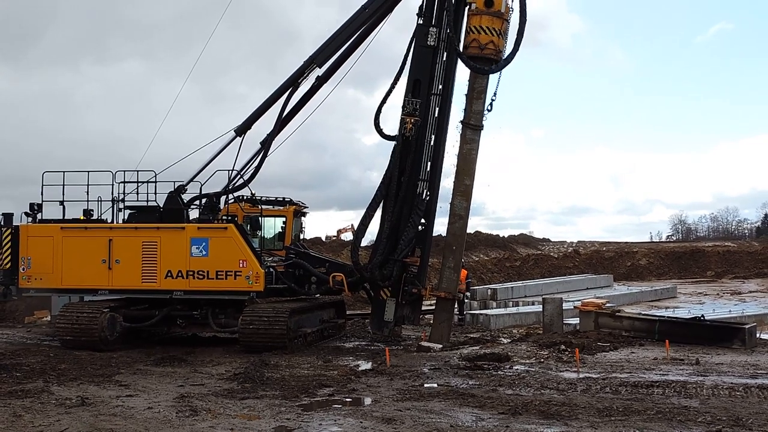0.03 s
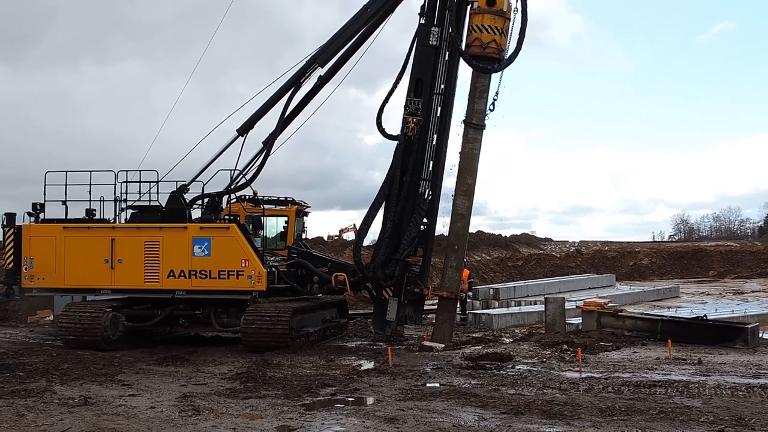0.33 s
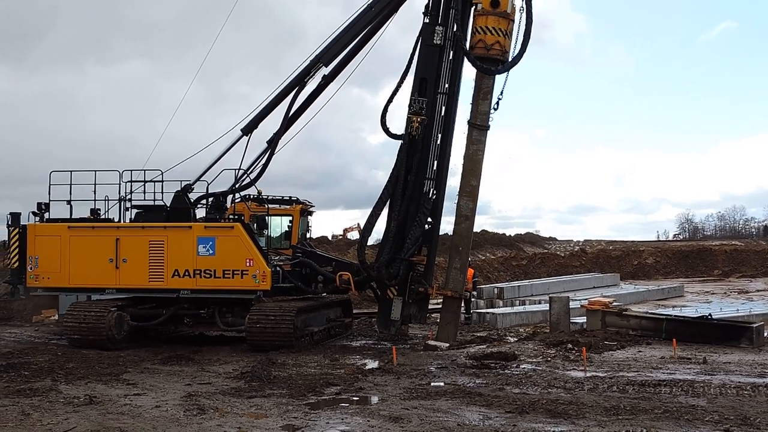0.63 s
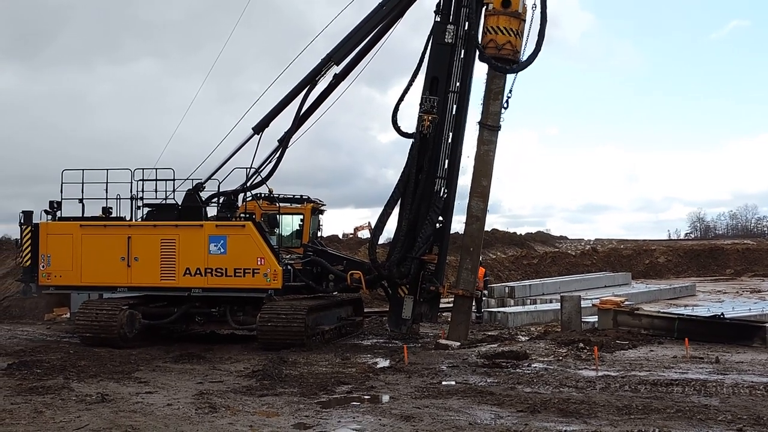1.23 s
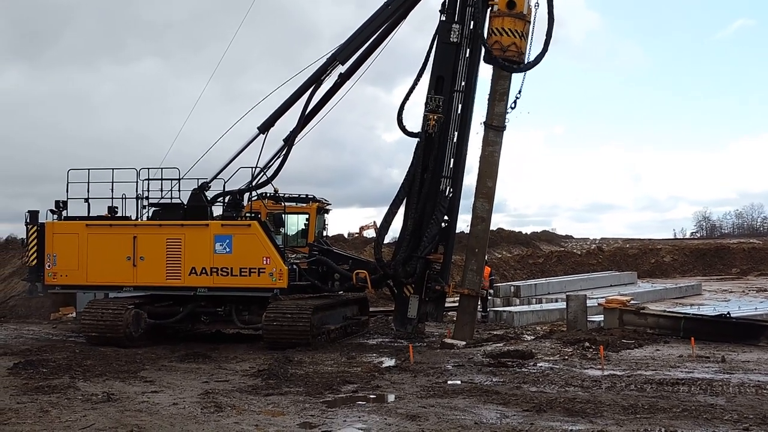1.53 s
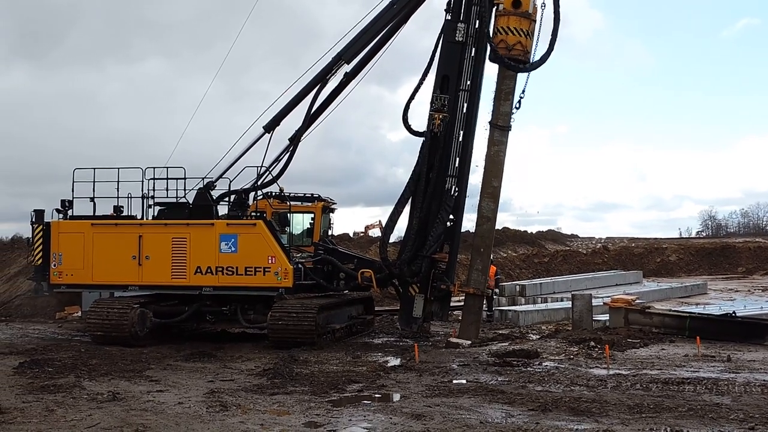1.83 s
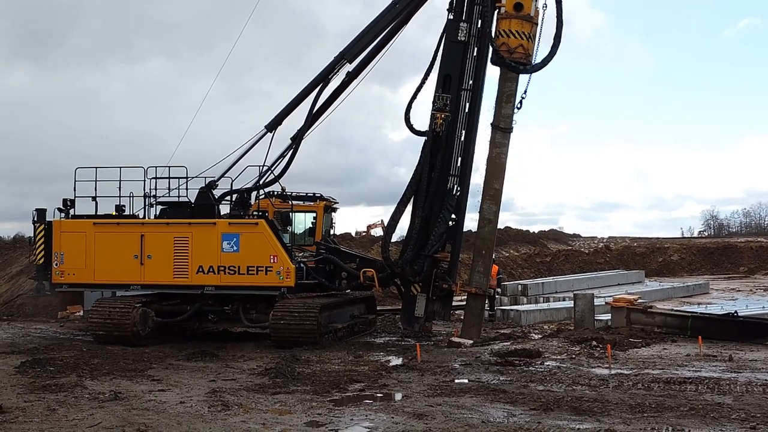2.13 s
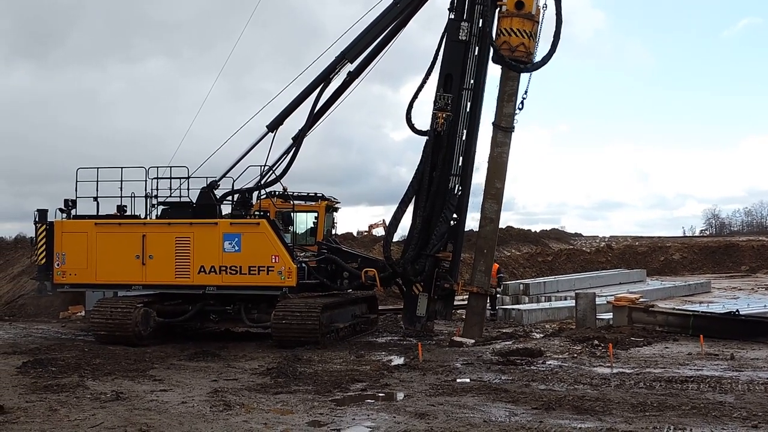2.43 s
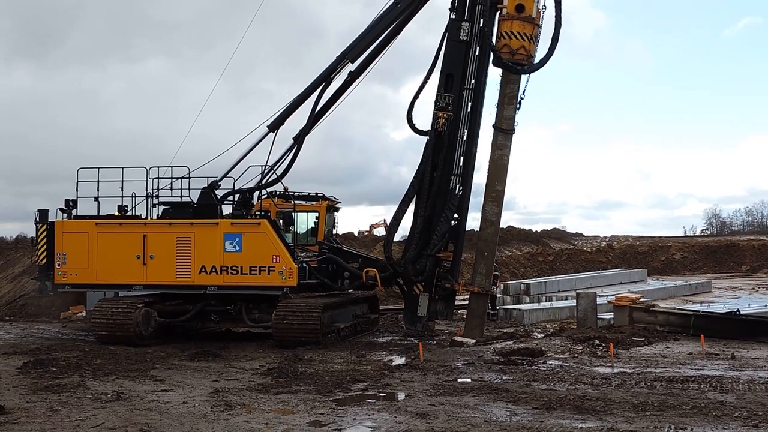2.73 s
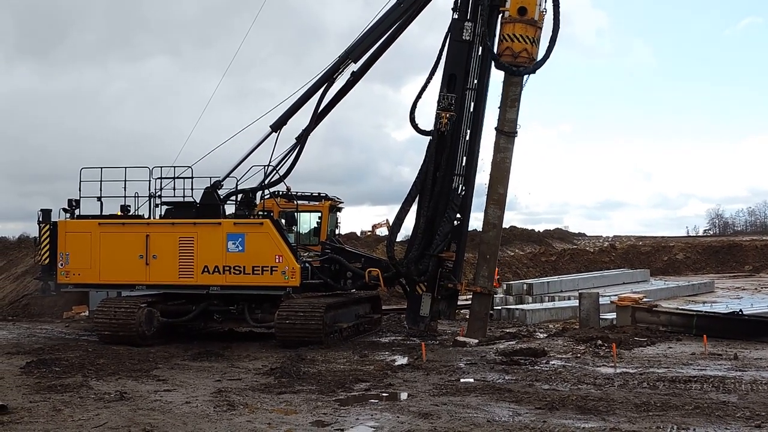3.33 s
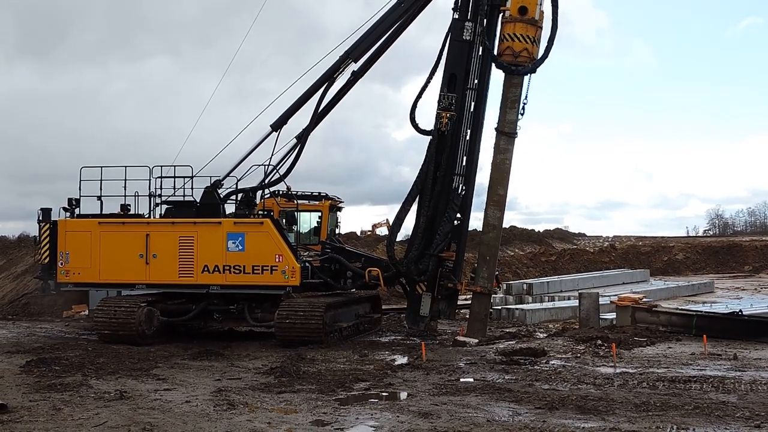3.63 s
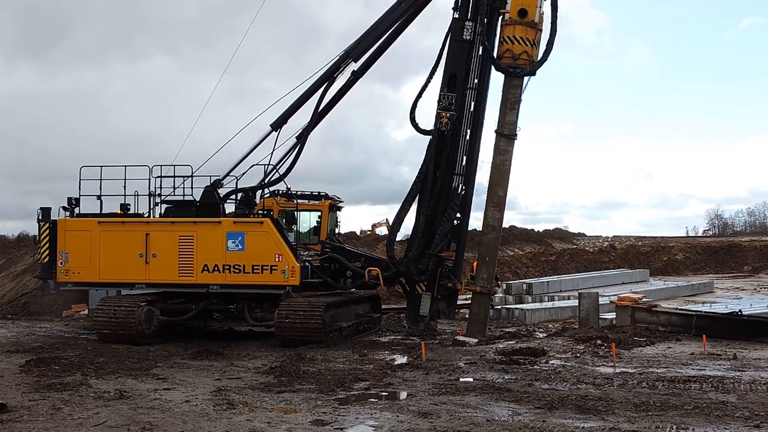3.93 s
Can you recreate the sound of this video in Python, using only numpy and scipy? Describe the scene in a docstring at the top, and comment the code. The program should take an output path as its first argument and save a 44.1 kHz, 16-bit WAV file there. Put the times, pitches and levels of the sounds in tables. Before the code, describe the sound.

Heavy pile driver blows repeat evenly outdoors, eight in all, each a deep boom with a steel clang and a short rattle. Faint valve hisses and chain clinks fall between the strikes, while a diesel engine rumbles underneath.

```python
"""An open building site: a hydraulic drop hammer drives a concrete pile, just under two blows a second.
The rig's diesel engine rumbles underneath. Each blow booms in the pile, clangs in the steel housing
and mast, rattles the chains and fittings and sets the drive cap's sleeve ringing. The ram bounces,
the valves hiss as it is lifted again, and the chain clinks near the top."""
import sys
import numpy as np
from scipy import signal
from scipy.fft import rfft, irfft
from scipy.io import wavfile

SR = 44100
rng = np.random.default_rng(int(sys.argv[2]) if len(sys.argv) > 2 else 0)


def transcribe(u):
    """Save the signal u as a 16-bit wav file named by the first command-line argument.

    u: samples, shape (n,) or (channels, n), limited to [-1, 1]; the rate is SR.
    q: integer samples, one column per channel.
    """
    v = np.clip(np.atleast_2d(u).T, -1, 1)
    q = np.round(v * 32767).astype(np.int16)
    wavfile.write(sys.argv[1], SR, q)


N = 176400
TIME_S = np.arange(N) / SR
AGE_S = TIME_S[:SR]   # each strike rings out within 1 s
BIN_HZ = np.arange(N // 2 + 1) * SR / N


def from_db(db):
    """Decibels to gain."""
    return 10 ** (np.asarray(db) / 20)


def at_hz(points, hz):
    """Read a table on a log-frequency axis."""
    point_hz, value = np.transpose(points)
    return np.interp(np.log(np.maximum(hz, 1)), np.log(point_hz), value)


def drift(rate_hz):
    """Low-passed random motion, standard deviation 1."""
    slow = irfft(rfft(rng.standard_normal(N)) / (1 + (BIN_HZ / rate_hz) ** 2), N)
    return (slow - slow.mean()) / slow.std()


def envelope(rise_s, t60_s):
    """Quick swell, exponential decay."""
    return (1 - np.exp(-(AGE_S / rise_s) ** 2)) * from_db(-60 * AGE_S / t60_s)


def add(out, start_s, sound):
    """Mix a sound in at a given time."""
    start = int(np.clip(start_s * SR, 0, out.shape[-1]))
    part = sound[..., :out.shape[-1] - start]
    out[..., start:start + part.shape[-1]] += part


def stereo(mid, side, correlation):
    """Left and right with a given correlation."""
    correlation = np.clip(correlation, 0, .999)
    side = side * np.sqrt((1 - correlation) / (1 + correlation))
    return np.array([mid + side, mid - side])


def noise(spectrum, correlation, ripple_db=0, ripple_spacing_hz=24.73):
    """Steady stereo noise; ripple adds the close resonances of steel fittings."""
    mid, side = rfft(rng.standard_normal((2, N)))
    ripple = np.interp(BIN_HZ / ripple_spacing_hz, np.arange(4096), rng.standard_normal(4096))
    gain = from_db(at_hz(spectrum, BIN_HZ) + ripple_db * ripple)
    return irfft(stereo(mid, side, at_hz(correlation, BIN_HZ)) * gain, N) * np.sqrt(SR / 2)


# Each row: frequency in Hz, rumble density in dB per Hz.
ENGINE_SPECTRUM = [(20, -91), (35, -59.5), (55, -59.5), (110, -57.5), (260, -56.5), (420, -62.5),
                   (700, -69), (1000, -75), (1500, -83.5), (2100, -91.5), (3000, -101), (4200, -113),
                   (6300, -115), (8500, -127), (13000, -134)]
# Each row: frequency in Hz, left-right correlation.
ENGINE_CORRELATION = [(40, 0.2), (100, 0.083), (250, 0.19), (900, 0.26), (3000, 0.25), (8000, .15)]
# Each row: multiple of the firing rate, level in dB.
ENGINE_HARMONICS = [(1, -46), (2, -52), (3, -44.5), (4, -42.5), (6, -51.5)]
# Each row: time in seconds, gain in dB.
ENGINE_GAIN = [(0, -4), (.3, -4.5), (.56, -8), (.8, -5.5), (1.15, 1.5), (2, -0.5), (2.7, 1.5), (3.2, 0),
               (3.6, 2.5), (4, 5)]


def engine(firing_hz=67.83, throb_depth=0.19, speed_wobble=0.01196, flutter_db=1):
    """Diesel rumble throbs at the firing rate, over a faint hum of low orders."""
    phase = 2 * np.pi * np.cumsum(firing_hz * (1 + speed_wobble * drift(4.8))) / SR
    rumble = noise(ENGINE_SPECTRUM, ENGINE_CORRELATION) * (1 + throb_depth * np.cos(phase))
    rumble *= from_db(flutter_db * drift(9))
    hum = sum(from_db(db) * np.sin(order * phase + rng.uniform(0, 2 * np.pi))
              for order, db in ENGINE_HARMONICS)
    return (rumble + hum) * from_db(np.interp(TIME_S, *np.transpose(ENGINE_GAIN)))


STEEL_RIPPLE_DB, CHATTER_GRAIN_DB = 3.5, 2.5
# All hammer noises. Each row: frequency in Hz, left-right correlation.
HAMMER_CORRELATION = [(60, 0.95), (300, 1), (1200, 0.99), (2500, 0.76), (4500, 0.98), (8000, 0.41),
                      (13000, .1)]
# Each row: start in seconds, level in dB.
CLACK_EVENTS = [(0.056, -10), (0.25, 0.5), (0.816, -0.5), (2.533, -7.5), (3.067, 1), (3.133, -5.5),
                (3.785, -11), (3.841, -9.5)]
# Each row: frequency in Hz, density in dB per Hz.
CLACK_SPECTRUM = [(60, -86), (300, -66), (900, -62.5), (1700, -70), (2600, -77), (4300, -90.5),
                  (6000, -105.5), (13000, -112)]


def clacks():
    """Stray knocks of the chain or the guide."""
    level = np.zeros(N)
    for start_s, db in CLACK_EVENTS:
        add(level, start_s, from_db(db) * envelope(rise_s=0.0053, t60_s=.25))
    grain = from_db(CHATTER_GRAIN_DB * drift(150))
    return level * grain * noise(CLACK_SPECTRUM, HAMMER_CORRELATION, STEEL_RIPPLE_DB)


def struck(modes, lag_at_100hz_s, stereo_spread_rad=0.07):
    """Modes ring with alternating signs; low bending waves arrive last."""
    out = np.zeros((2, len(AGE_S)))
    for k, (hz, db, t60_s, rise_s) in enumerate(modes):
        sign = (-1) ** k
        arrival_s = lag_at_100hz_s * np.sqrt(100 / hz)
        phase = 2 * np.pi * hz * AGE_S + sign * stereo_spread_rad * np.array([[1], [-1]])
        add(out, arrival_s, sign * from_db(db) * envelope(rise_s, t60_s) * np.sin(phase))
    return out


# Each row: start in seconds, then gains in dB for pile, clang, housing, follow-up events, sleeve.
HAMMER_BLOWS = [(.086, 0, 1, -0.5, 4.5, -2.5), (.630, -0.5, 0, -3, 2.5, -3), (1.176, 0, 1.5, 0, 5, 4),
                (1.720, 0.5, 1, -0.5, 2, 1.5), (2.264, .5, 1.5, 2.5, 2, -1.5), (2.805, 0.5, 1, 1, 3.5, -2),
                (3.347, 0, 1, 0.5, 2.5, -1), (3.883, -1, 1.5, -5, 4.5, -3)]
# Each row: frequency in Hz, mid-scene level in dB, T60 and rise in seconds, trend in dB per second.
PILE_RESONANCES = [(57, -30.5, 0.18, 0.0027, -3), (88, -21.5, 0.21, .003, .5),
                   (141.9, -14.5, .24, 0.0045, 1.5), (177.7, -19, 0.25, 0.0038, 0.1),
                   (213.6, -20, 0.66, 0.042, -2.5), (243.9, -14.5, 0.36, 0.007, 0.5),
                   (281.1, -14.5, 0.4, 0.03, -2), (334.6, -13, 0.18, 0.0045, -.7),
                   (372, -17, .22, 0.015, 0.5), (415.3, -30.5, 0.33, 0.0035, 3.5),
                   (485, -18.5, 0.17, 0.011, 2), (547.5, -30.5, 0.43, 0.027, -2),
                   (596, -26.5, 0.13, 0.0045, 4), (655, -23.5, 0.35, 0.046, 4.5)]


def pile():
    """Pile and helmet boom at each blow; the mode levels shift as the pile sinks."""
    out = np.zeros((2, N))
    for start_s, boom_db, *_ in HAMMER_BLOWS:
        from_middle_s = start_s - TIME_S.mean()
        modes = [(hz, db + boom_db + db_per_s * from_middle_s, t60_s, rise_s)
                 for hz, db, t60_s, rise_s, db_per_s in PILE_RESONANCES]
        add(out, start_s, struck(modes, lag_at_100hz_s=0.0049))
    return out


# Each row: frequency in Hz, level in dB, T60 in seconds.
HOUSING_RESONANCES = [(718, -27.5, 0.22), (751, -23.5, 0.23), (818, -29, 0.17), (940, -42, .18),
                      (1007.6, -20.5, .22), (1068, -32, 0.19), (1306, -42, 0.11), (1470, -52, 0.21),
                      (1765, -42, 0.34), (1970, -25, 0.11), (2059, -29, 0.17), (2685, -40, .18),
                      (3150, -38, 0.23)]


def housing(rise_s=0.013):
    """The steel housing clanks with each blow."""
    out = np.zeros((2, N))
    ring = struck([(*mode, rise_s) for mode in HOUSING_RESONANCES], lag_at_100hz_s=0.00596)
    for start_s, _, _, housing_db, _, _ in HAMMER_BLOWS:
        add(out, start_s, from_db(housing_db) * ring)
    return out


# Each row: frequency in Hz, density in dB per Hz.
CLANG_SPECTRUM = [(50, -47), (120, -47.5), (300, -41.5), (600, -43.5), (1000, -48.5), (1400, -54),
                  (2000, -55), (2400, -65.5), (3100, -61), (3700, -74.5), (5000, -76.5), (8000, -87),
                  (13000, -91)]
# Each row: frequency in Hz, rise in seconds.
CLANG_RISE_S = [(60, 0.003), (600, 0.0091), (2000, 0.0031), (4500, 0.018), (10000, 0.026)]
# Each row: frequency in Hz, T60 in seconds.
CLANG_T60_S = [(60, 0.28), (300, 0.48), (900, 0.35), (2000, 0.36), (4000, 0.32), (12000, 0.44)]
# Each row: frequency in Hz, share of power common to all blows.
CLANG_COMMON_SHARE = [(100, 1), (400, 0.78), (1100, 0.98), (2200, 0.23), (4500, 0.027)]


def clang(echo_db=-30):
    """Dense modes of hammer and mast decay band by band and echo around the site."""
    edges_hz = np.geomspace(40, 16000, 27)
    # Axes: common noise then one per blow, even/odd band, mid/side, time.
    white = rng.standard_normal((len(HAMMER_BLOWS) + 1, 2, 2, len(AGE_S)))
    echo = from_db(echo_db) * envelope(rise_s=0.055, t60_s=0.37)
    hits, out = 0, np.zeros((2, N))
    for k, (low_hz, high_hz) in enumerate(zip(edges_hz, edges_hz[1:])):
        hz = np.sqrt(low_hz * high_hz)
        bandpass = signal.butter(2, [low_hz, high_hz], "band", fs=SR, output="sos")
        shape = np.hypot(envelope(at_hz(CLANG_RISE_S, hz), at_hz(CLANG_T60_S, hz)), echo)
        band = signal.sosfilt(bandpass, white[:, k % 2])[..., ::-1] * shape
        target_energy = (high_hz - low_hz) * np.sum(shape ** 2)
        band *= np.sqrt(target_energy / np.sum(band ** 2, axis=-1, keepdims=True))
        common = at_hz(CLANG_COMMON_SHARE, hz)
        band = np.sqrt(common) * band[0] + np.sqrt(1 - common) * band[1:]
        pair = stereo(band[:, 0], band[:, 1], at_hz(HAMMER_CORRELATION, hz))
        hits = hits + from_db(at_hz(CLANG_SPECTRUM, hz)) * pair
    for k, (start_s, _, clang_db, *_) in enumerate(HAMMER_BLOWS):
        add(out, start_s, from_db(clang_db) * hits[:, k])
    return out


def after_each_blow(events, rise_s, delay_spread=0.0082, level_spread_db=0.54):
    """Envelope of the follow-up events of every blow, jittered in time and level."""
    power = np.zeros(N)
    for start_s, _, _, _, follow_up_db, _ in HAMMER_BLOWS:
        for delay_s, db, t60_s in events:
            late, strong = rng.standard_normal(2)
            onset_s = start_s + delay_s * (1 + delay_spread * late)
            gain = from_db(db + follow_up_db + level_spread_db * strong)
            add(power, onset_s, (gain * envelope(rise_s, t60_s)) ** 2)
    return np.sqrt(power)


# Each row: delay after the blow in seconds, level in dB, T60 in seconds.
RATTLE_EVENTS = [(.033, 11.5, 0.021), (.075, 1, 0.1), (.086, 7, 0.05), (.126, -7.5, 0.23),
                 (.148, -27, 0.11)]
# Each row: frequency in Hz, density in dB per Hz.
RATTLE_SPECTRUM = [(1500, -83), (3500, -85.5), (6000, -89.5), (9000, -94), (13000, -102.5)]


def rattles():
    """Shaken chains and fittings chatter in bright, grainy bursts."""
    level = after_each_blow(RATTLE_EVENTS, rise_s=0.0021)
    grain = from_db(CHATTER_GRAIN_DB * drift(300))
    return level * grain * noise(RATTLE_SPECTRUM, HAMMER_CORRELATION, STEEL_RIPPLE_DB)


# Each row: delay after the blow in seconds, level in dB, T60 in seconds.
BOUNCE_EVENTS = [(.052, -7, 0.12), (.081, 3, 0.3), (.165, -28, .2)]
# Each row: frequency in Hz, density in dB per Hz.
BOUNCE_SPECTRUM = [(30, -87.5), (100, -55.5), (300, -58), (800, -68.5), (1800, -66.5), (3000, -80),
                   (5000, -94), (13000, -108)]


def bounces():
    """The ram settles on the helmet with a few lesser knocks."""
    return after_each_blow(BOUNCE_EVENTS, rise_s=0.0031) * noise(BOUNCE_SPECTRUM, HAMMER_CORRELATION)


# Each row: frequency in Hz, level in dB, T60 in seconds.
SLEEVE_RESONANCES = [(979, -42.5, 1), (1776, -39, 0.23), (1786, -34.5, 0.82), (2870, -62, 0.99),
                     (3042, -50.5, 0.66), (3050, -54.5, 0.5), (6056, -71.5, 1.4)]


def sleeve(delay_s=.06, rise_s=0.021):
    """The drive cap's sleeve rings on, louder after some blows than others."""
    out = np.zeros((2, N))
    ring = struck([(*mode, rise_s) for mode in SLEEVE_RESONANCES], lag_at_100hz_s=0)
    for start_s, *_, sleeve_db in HAMMER_BLOWS:
        add(out, start_s + delay_s, from_db(sleeve_db) * ring)
    return out


# Each row: delay after the blow in seconds, level in dB, T60 in seconds.
VALVE_EVENTS = [(.273, -3, 0.35), (.325, -9, 0.15)]
# Each row: frequency in Hz, density in dB per Hz.
VALVE_SPECTRUM = [(60, -88), (300, -62), (700, -71), (1500, -71), (2500, -78.5), (3500, -90.5), (5000, -94),
                  (8000, -102), (13000, -108)]


def hydraulics(grain_db=1):
    """Oil spurts through the valves at set points of the lift."""
    level = after_each_blow(VALVE_EVENTS, rise_s=0.01)
    grain = from_db(grain_db * drift(100))
    return level * grain * noise(VALVE_SPECTRUM, HAMMER_CORRELATION, STEEL_RIPPLE_DB)


# Each row: delay after the blow in seconds, level in dB, T60 in seconds.
CLINK_EVENTS = [(.416, -3, .22), (.512, -4, 0.23)]
# Each row: frequency in Hz, density in dB per Hz.
CLINK_SPECTRUM = [(2000, -115), (3500, -106), (4800, -100), (6000, -107), (7500, -106), (10000, -116),
                  (13000, -122)]


def clinks():
    """The chain clinks near the top of the lift as the ram slows and drops."""
    level = after_each_blow(CLINK_EVENTS, rise_s=.006)
    return level * noise(CLINK_SPECTRUM, HAMMER_CORRELATION, STEEL_RIPPLE_DB)


# Each row: frequency in Hz, left minus right in dB.
STEREO_LEAN_DB = [(60, -2.3), (250, -1), (500, -1.1), (1000, 0.4), (2000, -0.5), (4000, 0), (8000, 1.5)]


def scene():
    """Hammer over engine, each register leaning slightly to one side."""
    blows = pile() + housing() + sleeve() + clang() + bounces()
    mix = blows + rattles() + clacks() + clinks() + hydraulics() + engine()
    channel_db = at_hz(STEREO_LEAN_DB, BIN_HZ) * np.array([[.5], [-.5]])
    return irfft(rfft(mix) * from_db(channel_db), N)


def record(dry, ceiling=0.98, cutoff_hz=13500):
    """Soft clip, then a steep low-pass."""
    lowpass = signal.ellip(10, .1, 80, cutoff_hz, fs=SR, output="sos")
    return signal.sosfilt(lowpass, ceiling * np.tanh(dry / ceiling))


dry = scene()
out = record(dry)
transcribe(out)
```